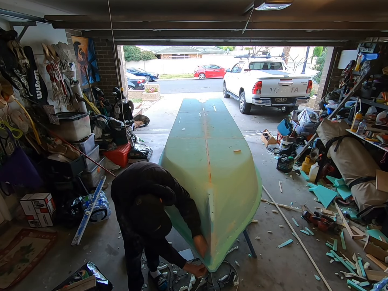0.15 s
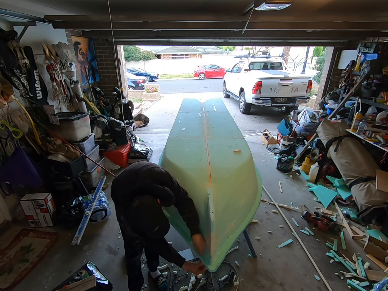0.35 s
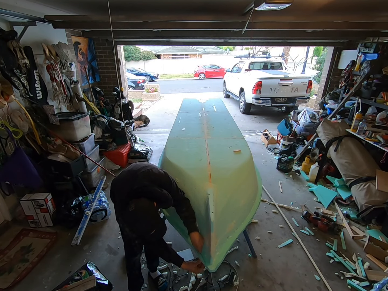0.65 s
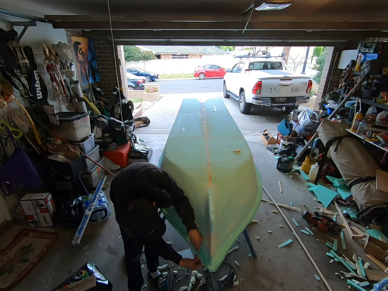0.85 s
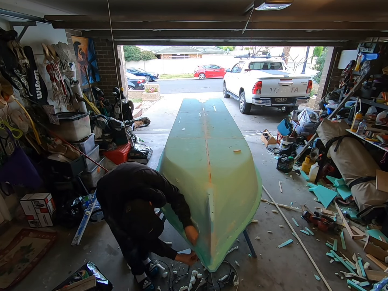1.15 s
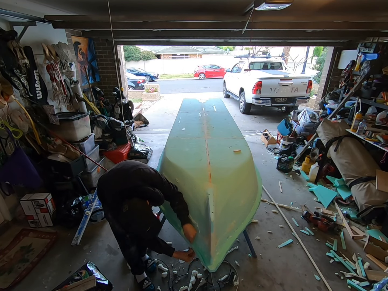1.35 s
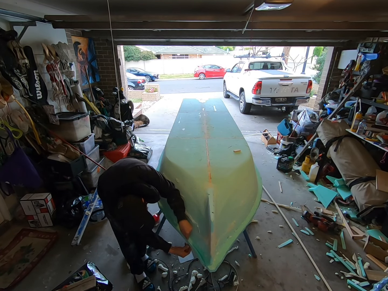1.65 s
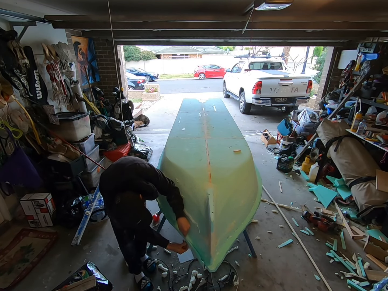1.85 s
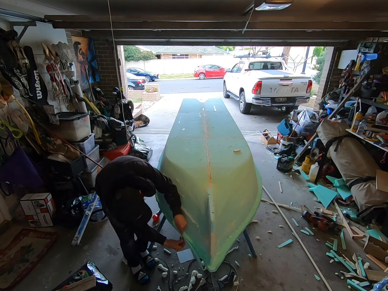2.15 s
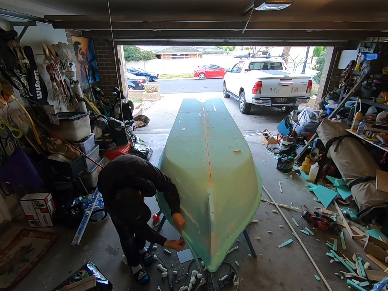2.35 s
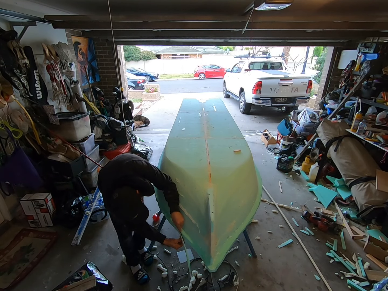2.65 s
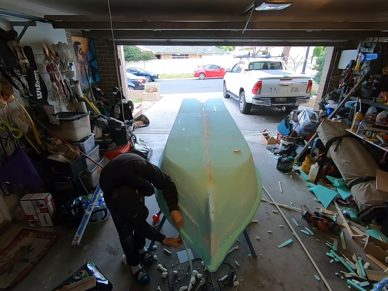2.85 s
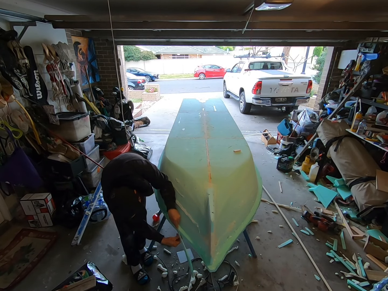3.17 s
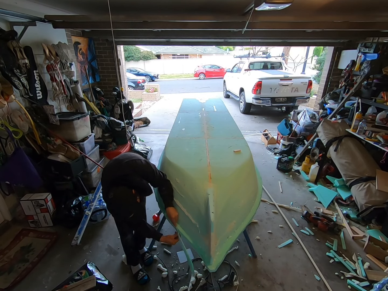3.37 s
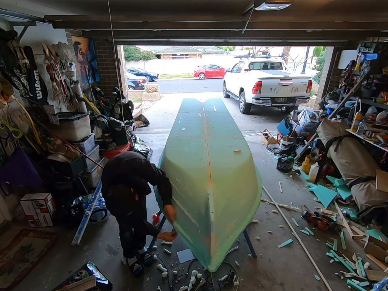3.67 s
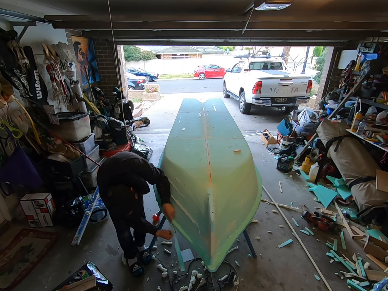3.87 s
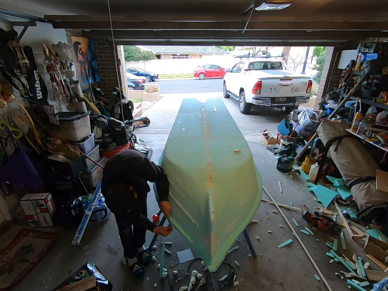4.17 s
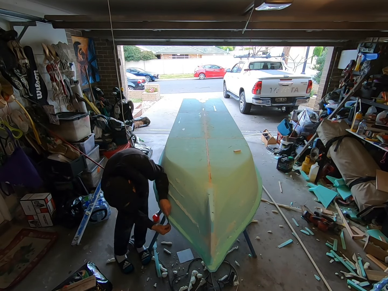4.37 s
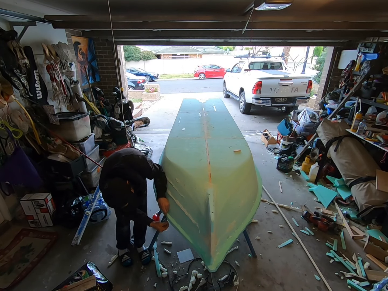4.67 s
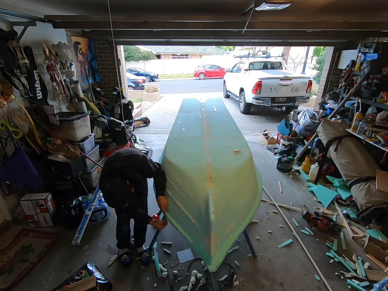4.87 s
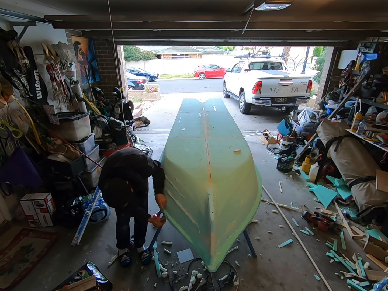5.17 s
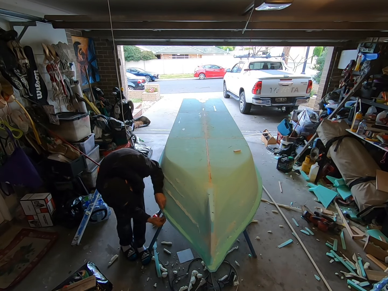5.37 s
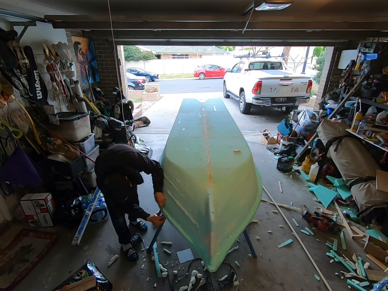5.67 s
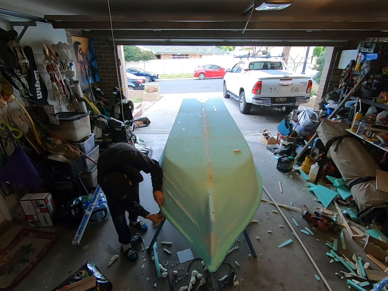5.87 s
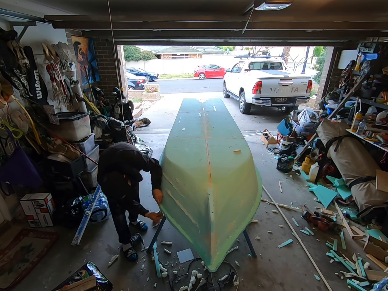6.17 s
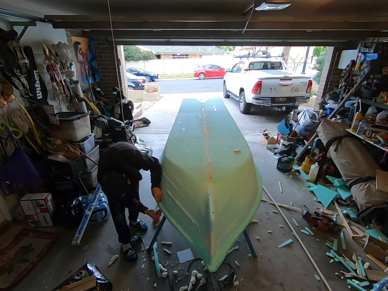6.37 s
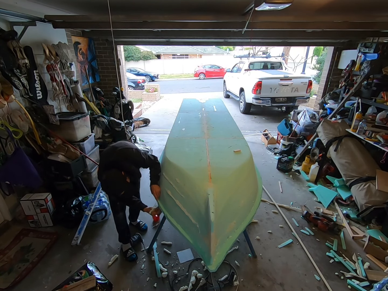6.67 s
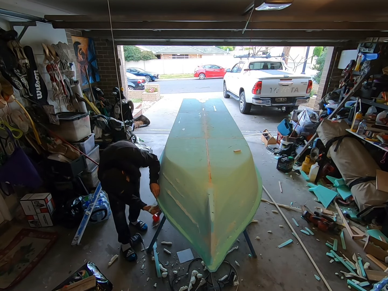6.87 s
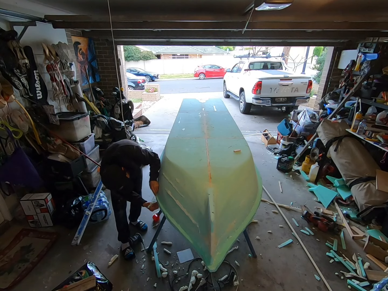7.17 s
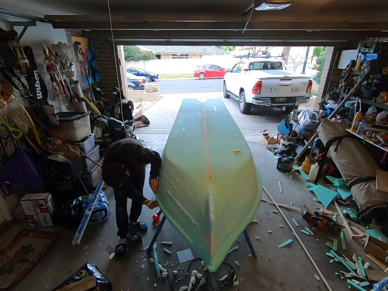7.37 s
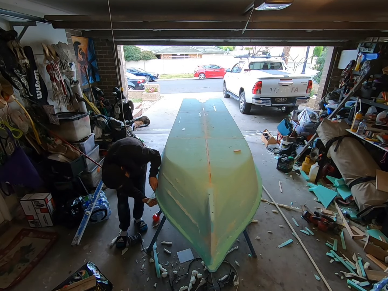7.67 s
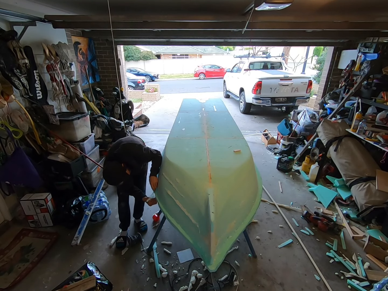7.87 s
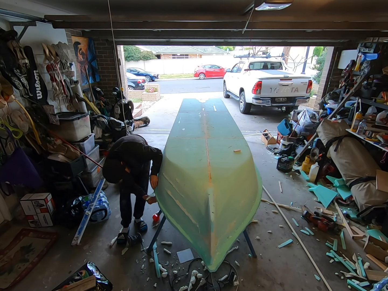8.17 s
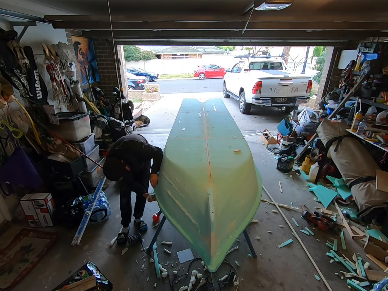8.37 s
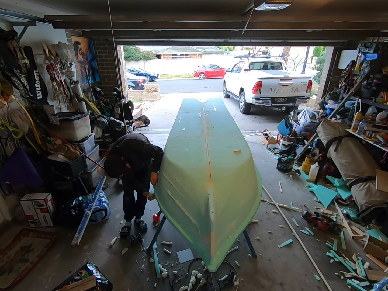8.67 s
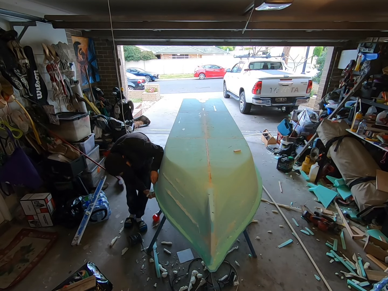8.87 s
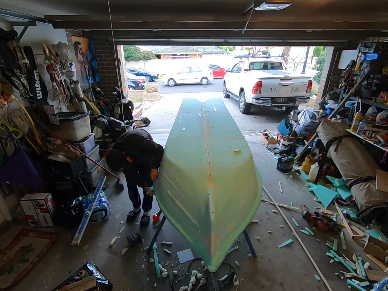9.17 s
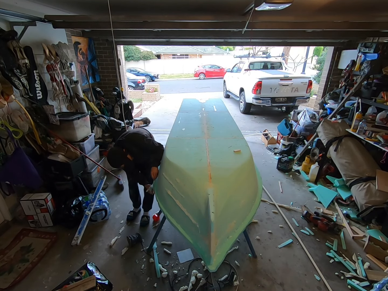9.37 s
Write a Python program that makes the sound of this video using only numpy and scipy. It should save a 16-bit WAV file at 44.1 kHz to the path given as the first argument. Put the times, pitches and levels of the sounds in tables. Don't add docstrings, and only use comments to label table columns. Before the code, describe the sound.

Close dry crunchy sawing strokes on foam, quick and uneven, with small bumps, a hard snap midway, and low moaning drags near the end.

```python
import sys
import numpy as np
from scipy import signal
from scipy.fft import rfft, irfft, next_fast_len
from scipy.io import wavfile
from scipy.ndimage import uniform_filter1d, map_coordinates

SR = 44100
rng = np.random.default_rng(int(sys.argv[2]) if len(sys.argv) > 2 else 0)


def volts_from_decibels(level):
    exponent = np.asarray(level, float) / 20
    return 10 ** exponent


def generate_wav(signal):
    frames = np.transpose(np.atleast_2d(signal))
    scaled = np.clip(frames, -1, 1) * 32767
    pcm = np.round(scaled).astype(np.int16)
    wavfile.write(sys.argv[1], SR, pcm)


N = 420273

# start_s, level_db
DRAG = [(0, -39.5), (.13, -45.5), (.32, -41.5), (.6, -37), (.77, -43.5), (2.02, -45), (2.44, -65),
        (2.52, -51), (2.68, -69.5), (2.75, -56), (3.48, -56), (3.8, -60.5), (5.07, -65), (7.88, -63),
        (8.7, -52), (9.0, -47), (9.29, -34.5), (9.53, -56.5)]
LIGHT_DB = -59
# turn_s, turn_db, rise_to_bite_s, bite_db
STROKES = [(0.0, -36, 0.0067, -38), (.03, -41, 0.0036, -46.5), (0.066, -54, 0.018, -46),
           (.107, -48, 0.038, -38.5), (.178, -45.5, 0.03, -39.5), (.238, -42.5, .02, -44),
           (.278, -44.5, .015, -44), (.325, -48, 0.0084, -37.5), (.372, -47.5, 0.029, -39),
           (.423, -46, 0.0089, -37.5), (.465, -46.5, 0.032, -40), (.528, -44, 0.016, -37),
           (0.564, -42, 0.0085, -36), (.599, -49, 0.009, -41.5), (.63, -43, .01, -40),
           (.66, -43, 0.013, -43), (.698, -47.5, 0.016, -41), (.742, -46, 0.097, -41.5),
           (.948, -44.5, 0.043, -39.5), (1.038, -45, 0.014, -38.5), (1.115, -45.5, 0.045, -38),
           (1.172, -39, 0.019, -38.5), (1.215, -45, .01, -43), (1.293, -45.5, 0.033, -41.5),
           (1.55, -43.5, 0.067, -41), (1.7, -42, .04, -39), (1.76, -38.5, 0.0089, -40),
           (1.838, -46.5, 0.07, -39), (1.957, -45, 0.034, -38), (2.059, -44, 0.031, -40),
           (2.133, -49.5, 0.03, -38.5), (2.243, -49.5, 0.041, -44), (2.321, -56, 0.014, -46.5),
           (2.379, -57, 0.013, -51), (2.436, -62, 0.048, -42), (2.634, -52, 0.048, -52.5),
           (2.71, -70, 0.015, -48), (2.768, -55.5, 0.059, -43.5), (2.869, -53, 0.025, -42.5),
           (2.939, -52, 0.045, -43),
           (3.022, -55, 0.042, -39.5), (3.117, -45, 0.058, -41), (3.293, -46, 0.084, -40.5),
                (3.429, -55.5, 0.031, -36.5), (3.515, -65, 0.015, -53), (3.542, -61, 0.028, -40),
                (3.688, -41.5, 0.048, -35), (3.817, -65, 0.015, -42), (3.941, -50, 0.088, -37.5),
                (4.037, -50, 0.0094, -39), (4.17, -48, 0.057, -42), (4.334, -51.5, 0.014, -46.5),
                (4.39, -51.5, 0.021, -45.5), (4.432, -46.5, 0.054, -41), (4.5, -39.5, 0.018, -38.5),
                (4.564, -43.5, 0.024, -38.5), (4.635, -39.5, 0.0062, -41), (4.709, -67, 0.014, -50.5),
                (4.787, -64, 0.023, -46.5), (4.845, -56.5, 0.025, -42), (4.937, -45.5, 0.042, -42.5),
                (4.997, -49, .006, -40), (5.025, -47, 0.0078, -42), (5.11, -49, 0.022, -39.5),
                (5.212, -52.5, 0.021, -36), (5.299, -53.5, .0067, -47), (5.335, -53, 0.019, -40),
                (5.492, -62, 0.029, -51.5), (5.56, -68, 0.018, -52), (5.612, -54, 0.011, -41),
                (5.711, -70, 0.0045, -46), (5.751, -65, 0.022, -41.5), (5.816, -57, 0.031, -40),
           (5.908, -53, 0.016, -40), (5.983, -50.5, 0.085, -47.5), (6.08, -64, 0.0078, -42.5),
                (6.179, -47, 0.033, -38.5), (6.272, -64.5, 0.059, -37.5), (6.39, -44, 0.045, -42.5),
                (6.474, -51.5, 0.026, -40), (6.565, -49, 0.0092, -46), (6.627, -56.5, 0.016, -47),
                (6.676, -55, 0.024, -42), (6.745, -54.5, 0.019, -42), (6.825, -50, 0.036, -41),
                (6.912, -53.5, 0.036, -40.5), (7.044, -53.5, 0.03, -42.5), (7.128, -48, 0.037, -43),
                (7.198, -52.5, 0.033, -43.5), (7.296, -46.5, 0.0058, -44.5), (7.369, -46.5, 0.11, -38.5),
                (7.535, -53, 0.038, -46), (7.643, -52, 0.018, -39.5), (7.719, -51.5, 0.0076, -44.5),
                (7.765, -45, 0.022, -45), (7.83, -55, 0.017, -51.5), (7.885, -57, 0.011, -55.5),
                (7.99, -62, .01, -55), (8.045, -53.5, 0.037, -46), (8.127, -52.5, 0.031, -43),
                (8.243, -48, .02, -45), (8.3, -47, 0.035, -41.5), (8.375, -47, 0.0036, -43),
                (8.557, -48.5, 0.036, -45), (8.7, -45, 0.044, -41), (8.882, -43.5, 0.065, -42),
                (9.189, -39, 0.034, -39.5), (9.4, -41, .02, -41.5), (9.47, -43, .02, -41.5)]
LET_GO_SHARE, SLOWEST_FALL_DB_PER_S, SAG_DB_PER_S = 0.68, 42, 1
SIDE_FROM_S, SIDE_FADE_S = 7.9, 0.2

# start_s, edge_db
EDGE_ON = [(0, -8), (.75, -7), (1.15, -1.5), (1.5, -1.5), (1.9, -0.5), (2.5, -2.5), (3.5, -1), (3.95, -1),
           (4.6, -2.5), (5.4, -2), (6.1, -4.5), (7.2, -2.5), (7.45, 0), (7.6, -2.5), (8.4, -3), (8.86, -6),
           (8.92, -6), (9.53, -5.5)]
# freq_hz, density_db_per_hz
TEAR = [(1350, -19), (2300, 1), (3500, -2), (3850, 1), (4450, 1), (4910, -1.5), (5510, -1.5), (7200, -18),
        (9360, -21), (15800, -120)]
FIZZ = [(3820, -32), (6500, -5), (8170, -3), (9840, -2.5), (11800, -5.5), (13500, -6), (15500, -9.5)]
# pitch_hz, width_hz, level_db
EDGE = [(5150, 35, -13), (6600, 200, 1.5), (6040, 390, 15.5), (7600, 63, -19), (8670, 31, 10),
        (9410, 220, 10), (12300, 400, -4)]
# pitch_hz, width_hz, level_db
RASP = [(1300, 216, -4.5), (1450, 160, -0.5), (1630, 37, 0), (1708, 120, -2.5), (2102, 243, -1),
        (2293, 95, 1), (3280, 400, -10.5)]
SIDE_RASP = [(1300, 320, 6), (2100, 120, 11), (2920, 570, 0), (4150, 130, 10), (4590, 360, -7),
             (6100, 240, -33)]
RASP_DB, RASP_PER_EDGE, RASP_PER_LEAN, SIDE_RASP_DB = -13.5, -1.35, 0.21, 3
# start_s, length_s, level_over_stroke_db, pitch_hz
BLADE_NOTES = [
    (.28, 0.48, -9.5, 4310),
    (8.1, 1.1, -14.5, 3026),
    (8.2, .95, -13, 3936),
]
BLADE_SHARPNESS = 99

# pitch_hz, width_hz, level_db
SKIN = [(748, 93, -2.5), (838, 95, 2), (925, 109, -1), (1163, 8.6, -1.5)]
SIDE_SKIN = [(506, 49, -12), (684, 61, 0.5), (771, 77, -1), (930, 80, -9.5), (1070, 340, -22)]
# pitch_hz, width_hz, level_db
BOW_PANEL = [(865.6, 18, 2), (902.7, 24, -2)]
# start_s, level_db
BOW_NEARNESS = [(0, -0.5), (.7, 1), (1.2, 5), (2.1, 4), (2.7, 0.5), (3.1, 0.5), (3.6, 3), (4.2, -5),
                (9.53, -0.5)]
# pitch_hz, width_hz, level_db
RIB = [(550, 130, -10), (603, 38, -2), (666, 15.4, 3)]
# pitch_hz, width_hz, level_db
CAVITY = [(45.6, 47, -32), (85, 19, -18), (153.7, 16, -4.5), (202, 28, -4), (312, 44, -6), (384, 16, -22)]
RIB_PER_LEAN, CAVITY_DB, CAVITY_PER_LEAN = -0.48, -75.5, 0.47

# start_s, freq_hz, depth_db
SHADOW = [(.7, 5140, 1.5), (.93, 4800, 10), (1.08, 3930, 20), (1.2, 3200, 8), (1.3, 2740, 12),
          (1.42, 2420, 13), (1.65, 1930, 15), (1.85, 1560, 14), (2.1, 1240, 21), (2.4, 990, -12)]
# freq_hz, density_db_per_hz
AIR = [(15, -64), (25, -19), (90, -10), (200, -6.5), (373, -16.5), (463, -1.5), (659, -4.5), (1520, -12.5),
       (2160, -4), (2350, -9), (4030, -3.5), (8830, -8.5), (14800, -13), (16000, -17)]
AIR_DB = -49.5
# freq_hz, likeness_ratio
ALIKE = [(60, 0.18), (130, 0.73), (290, 0.29), (640, 0.54), (1410, 0.16), (3100, 0.074), (6820, 0.15),
         (15000, 1)]
# freq_hz, t60_s
GARAGE = [(200, 0.32), (2000, 0.069), (10000, 0.025)]
# freq_hz, level_db
WET = [(200, -22), (700, -43), (1500, -8), (3500, -0.5), (8000, -0.5), (12000, -4), (15000, 3)]

# start_s, peak_db, t60_s, pitch_hz, puff_db
BUMPS = [(0.114, -50, 0.2, 172, -1), (0.336, -34.5, 0.12, 189, 0), (.345, -43, 0.31, 298, 0),
         (.54, -49.5, 0.26, 318, -6), (1.035, -32.5, 0.16, 189, -5), (1.045, -39, 0.2, 282, -6),
         (1.075, -40, 0.14, 315, -10), (1.122, -39, 0.14, 183, -1), (1.912, -27, 0.16, 876, -23),
         (2.018, -23.5, 0.13, 906, -30), (1.135, -38, 0.19, 274, -5), (1.19, -52.5, 0.38, 321, 2),
         (2.71, -61, 0.1, 70, 0), (8.957, -45, 0.19, 142, -7.5), (3.18, -45, 0.058, 90, 3),
         (4.0, -53, 0.24, 238.6, 5), (4.071, -46, 0.13, 262, -3), (5.479, -34.5, 0.067, 527, -34),
         (6.91, -57.5, 1.6, 284, -22), (7.421, -57, 0.57, 194, -8), (8.532, -39, 0.069, 92, -11),
         (9.168, -43.5, 0.25, 85, -10)]
# start_s, peak_db, pitch_hz
NUDGES = [(2.292, -59, 182), (2.466, -56, 213), (2.613, -58, 272), (2.782, -58, 192), (2.895, -49, 197),
          (3.173, -55, 242), (3.385, -47, 193), (3.468, -50, 195), (3.591, -48, 314.8), (3.686, -56, 149),
          (3.891, -68, 191), (4.006, -49, 297), (4.07, -48, 233), (4.321, -61, 213), (4.473, -62, 203),
          (4.936, -56, 204), (5.214, -58, 228), (5.379, -59, 155), (5.628, -58, 205), (5.718, -55, 217),
          (5.949, -62, 310), (6.1, -60, 223), (6.198, -62, 315), (6.992, -53, 285), (7.272, -62, 277),
          (7.428, -53, 198), (7.579, -53, 188.7), (7.694, -56, 178), (7.84, -68, 162), (8.054, -56, 174)]
NUDGE_DB, NUDGE_T60_S, NUDGE_PUFF_DB = 2, 0.13, -3
# pitch_hz, width_hz, level_db
PUFF = [(70, 110, -12.5), (213, 51, 10.0), (335, 120, 3.5)]

# start_s, length_s, level_db, from_hz, to_hz
RINGS = [(0.201, 0.036, -40.5, 5350, 5260), (0.783, 0.049, -44, 5400, 5200), (.85, 0.65, -53, 3680, 1800),
         (8.298, .1, -52, 4000, 3900), (8.58, 0.13, -55, 3000, 2950), (4.35, 0.047, -59, 9100, 9200),
         (5.22, 0.062, -45, 2090, 2170), (5.613, 0.054, -45.5, 2080, 2100), (7.422, 0.098, -40, 5700, 5500),
         (8.723, 0.57, -50, 3900, 4030), (9.358, 0.28, -47.5, 2800, 2760)]
RING_WIDTH, RING_RISE, RING_FADE = 0.045, 0.12, 0.28
# start_s, length_s, level_db, from_hz, to_hz
SKIDS = [
    (0.811, 0.033, -36.5, 3600, 2500),
    (4.001, 0.032, -28.5, 8400, 4400),
    (4.633, 0.052, -46, 2900, 1000),
    (3.115, 0.094, -37.5, 8700, 6600),
    (3.148, 0.12, -39.5, 3400, 4200),
    (3.21, 0.078, -41, 5000, 6000),
    (4.426, 0.097, -40, 10500, 13000),
    (9.16, 0.04, -37.5, 8900, 8500),
    (9.133, 0.4, -37.5, 2500, 3700),
]
SKID_WIDTH, SKID_OVERTONE, SKID_OVERTONE_DB = 0.21, 1.87, -9.5
# start_s, length_s, level_db, lowest_hz, width_share
SWISHES = [
    (4.028, 0.064, -35.5, 4180, 0.69),
    (7.421, 0.1, -30, 6900, 0.43),
]
SWISH_RISE, SWISH_FADE = 0.22, 0.23
DIVE_OCT, CLIMB_OCT, LOWEST_AT = 0.84, 0.88, 0.16
# start_s, peak_db, body_db, t60_s, lowest_hz
CATCHES = [(2.148, -25, -29, 0.07, 2200), (2.4759, -28.5, -8, 0.041, 2200), (3.4465, -24, -19, 0.073, 2200),
           (4.1027, -25, -17, 0.14, 2200), (.5835, -38, -20, .04, 1200), (.642, -38, -20, .04, 1200),
           (4.369, -26.5, -27, 0.034, 2500), (4.968, -23, -45, 0.084, 7000), (5.03, -27, -16, 0.036, 6000),
           (5.126, -28, -29, 0.04, 5000), (5.6212, -17, -42, 0.011, 2980), (5.6218, -19, -42, 0.088, 2500),
           (5.637, -24, -33, 0.047, 2000), (5.7152, -42, -24, 0.038, 1800), (5.7666, -32, -28, 0.06, 2200),
           (5.917, -31, -24, 0.05, 2200), (6.0538, -26.5, -38, 0.12, 2200),
           (6.194, -24.5, -39, 0.077, 2200)]
SOFT_RISE_S, HARD_DB = 0.00026, -20

# start_s, level_db, third_overtone_db
HUM = [
    [(8.18, -80, -20.5), (8.262, -58, -6), (8.282, -57, -8), (8.302, -79, -8), (8.452, -53.5, -10),
     (8.488, -64, -8), (8.56, -66, -8), (8.58, -67, -8)],
    [(8.6, -61, -17), (8.7, -47, -10), (8.77, -53, -4), (8.84, -68, -8), (8.886, -54, -1), (8.964, -57, -5),
     (9.012, -67, -8), (9.06, -64, -8)],
    [(9.07, -60, -5), (9.128, -43, 0.5), (9.264, -46, -12), (9.284, -44, -8), (9.388, -43, -8),
     (9.432, -54, -10), (9.514, -49.5, -6.5), (9.53, -52.5, -8)],
]
HUM_HZ, HUM_HZ_PER_LEAN = 196.4, 0.35
HUM_SECOND_DB, RUMBLE_DB = -11.5, -7.5
# pitch_hz, width_hz, level_db
RUMBLE = [(90, 77, -12.5), (163, 35, 2), (268, 80, -1)]

TOP_HZ = 15600


def unit(x):
    return x / np.sqrt(np.mean(x ** 2) + 1e-20)


def along(points, hz):
    f, v = np.transpose(points)
    return np.interp(np.log(hz + 1), np.log(f + 1), v)


def curves(rows):
    s, *cols = np.transpose(rows)
    return [np.interp(np.arange(N) / SR, s, c) for c in cols]


def wobble(rate):
    knots = rng.standard_normal(int(N * rate / SR) + 4)
    return map_coordinates(knots, [np.arange(N) * rate / SR])


def filtered(x, response):
    m = next_fast_len(N + SR // 2)
    return irfft(rfft(x, m) * response(np.fft.rfftfreq(m, 1 / SR)), m)[..., :N]


def modes(table):
    def response(f):
        total = 0
        for k, (c, w, db) in enumerate(table):
            total = total + (-1) ** k * volts_from_decibels(db) * 1j * f * w / (c * c - f * f + 1j * f * w)
        return total
    return response


def swept(x, gain):
    hz, t, z = signal.stft(x, SR, nperseg=384)
    return signal.istft(z * gain(np.log(hz[:, None] + 1), t), SR, nperseg=384)[1][:N]


def bell(log_f, hz, width):
    return np.exp(-0.5 * ((log_f - np.log(hz)) / width) ** 2)


def swell(t, start, length, rise, fade):
    u = (t - start) / length
    return u, np.clip(np.minimum(u / rise, (1 - u) / fade), 0, 1) ** 2


def snaps(per_s, spread_db, hush):
    when, size, sign = rng.random((3, N))
    sizes = volts_from_decibels(-spread_db * np.log(size + 0.0035))
    bursts = (when < per_s / SR) * sizes * np.sign(sign - 0.5)
    return unit(unit(bursts) + hush * rng.standard_normal(N))


def lean():
    return curves(DRAG)[0] - LIGHT_DB


def on_side():
    return np.clip((np.arange(N) / SR - SIDE_FROM_S) / SIDE_FADE_S, 0, 1)


def grip():
    s, turn_db, rise, bite_db = np.transpose(STROKES)
    end = np.append(s[1:], N / SR + 0.1)
    end_db = np.append(turn_db[1:], turn_db[-1])
    slowest = abs(bite_db - end_db) / SLOWEST_FALL_DB_PER_S
    fall = np.minimum(LET_GO_SHARE * abs(end - s - rise), slowest)
    let_go_db = bite_db - SAG_DB_PER_S * abs(end - fall - s - rise)
    times = np.maximum.accumulate(np.transpose([s, s + rise, end - fall]).ravel())
    levels = np.transpose([turn_db, bite_db, let_go_db]).ravel()
    return curves(np.transpose([times, levels]))[0]


def blade():
    edge_db, = curves(EDGE_ON)
    fizz_share = 1 / (1 + volts_from_decibels(-2 * (edge_db + 1.65 * wobble(8.2))))
    tremble = volts_from_decibels(0.5 * wobble(45) + 0.74 * wobble(150))
    force = snaps(per_s=5000, spread_db=2.5, hush=0.72) * tremble
    singing = np.clip(0.5 + 0.55 * wobble(5.5), 0, 1)
    sung = filtered(force, lambda hz: abs(1 + 0.19 * modes(EDGE)(hz)))
    force_edge = singing * sung + (1 - singing) * force

    def coloured(table):
        return unit(filtered(force_edge, lambda hz: volts_from_decibels(along(table, hz))))

    tear = volts_from_decibels(-1.83) * np.sqrt(1 - fizz_share) * coloured(TEAR)
    fizz = volts_from_decibels(3.5) * np.sqrt(fizz_share) * coloured(FIZZ)
    moved = on_side()
    panel = (1 - moved) * unit(filtered(force, modes(RASP)))
    panel = panel + moved * volts_from_decibels(SIDE_RASP_DB) * unit(filtered(force, modes(SIDE_RASP)))
    rasp = volts_from_decibels(RASP_DB + RASP_PER_EDGE * edge_db + RASP_PER_LEAN * lean()) * panel
    for start, length, db, hz in BLADE_NOTES:
        note = unit(signal.lfilter(*signal.iirpeak(hz, BLADE_SHARPNESS, SR), force))
        rasp = rasp + volts_from_decibels(db) * swell(np.arange(N) / SR, start, length, RING_RISE, 0.18)[1] * note
    return volts_from_decibels(grip() - 1.5) * (tear + fizz + rasp)


def hull():
    skin_db = LIGHT_DB + lean()
    rib_db = RIB_PER_LEAN * lean()
    cavity_db = CAVITY_DB + CAVITY_PER_LEAN * lean()
    grip_db = grip()
    flutter_db = grip_db - uniform_filter1d(grip_db, size=SR // 5)
    force = snaps(per_s=1200, spread_db=5.0, hush=1.06) * volts_from_decibels(0.53 * wobble(25) + 0.68 * flutter_db)

    def shaken(table):
        return unit(filtered(force, lambda hz: modes(table)(hz) / (1 + (440 / (hz + 1)) ** 6)))

    near_db, = curves(BOW_NEARNESS)
    bow = (shaken(SKIN) + volts_from_decibels(near_db) * shaken(BOW_PANEL)) / np.sqrt(1 + volts_from_decibels(2 * near_db))
    skin = (1 - on_side()) * bow + on_side() * shaken(SIDE_SKIN)
    rib = volts_from_decibels(rib_db - 1.5 + 1.4 * wobble(8.1)) * shaken(RIB)
    lumps = volts_from_decibels(0.07 * flutter_db + 3.5 * np.tanh(wobble(16)))
    cavity = unit(filtered(force * lumps, modes(CAVITY)))
    return volts_from_decibels(skin_db + 3.5) * (skin + rib) + volts_from_decibels(cavity_db + 5.5) * cavity


def shadow(x):
    s, dip_hz, depth_db = np.transpose(SHADOW)

    def gain(f, t):
        hz = np.interp(t, s, dip_hz)
        shape = 0.48 * bell(f, 0.86 * hz, 0.13) - bell(f, 0.93 * hz, 0.08) - 0.24 * bell(f, 1.236 * hz, 0.056)
        return volts_from_decibels(np.interp(t, s, depth_db) * shape)
    return swept(x, gain)


def garage(x):
    step = SR // 10
    out = np.zeros((2, N + 2 * SR))
    pieces = signal.stft(x, nperseg=2 * step, return_onesided=False)[2]
    pieces = np.fft.ifft(pieces, axis=0).real.T * step
    noise = rng.standard_normal((len(pieces), 2, SR // 12))
    hz, t, z = signal.stft(noise, SR, nperseg=256)
    tails = signal.istft(z * volts_from_decibels(-60 * t / along(GARAGE, hz)[:, None]), SR, nperseg=256)[1]
    tails = tails / np.linalg.norm(tails, axis=2, keepdims=True)
    echoes = signal.fftconvolve(pieces[:, None], tails, axes=2)
    for k, echo in enumerate(echoes):
        out[:, k * step:][:, :echo.shape[1]] += echo
    late = out[:, step - 60:][:, :N]
    return filtered(late, lambda hz: volts_from_decibels(along(WET, hz) + 0.3))


def air():
    def mid_side(hz):
        turn = np.arccos(np.clip(along(ALIKE, hz), -1, 1)) / 2
        dull = hz / (hz + 250) / np.sqrt(1 + (hz / 1200) ** 2.0)
        return dull * volts_from_decibels(along(AIR, hz)) * np.array([np.cos(turn), np.sin(turn)])

    mid, side = filtered(rng.standard_normal((2, N)), mid_side)
    return volts_from_decibels(AIR_DB - 9.0 + 2.6 * wobble(3.42)) * unit(np.array([mid + side, mid - side]))


def bumps():
    ring, puff = np.zeros((2, N + SR))
    t = np.arange(SR // 2) / SR
    nudges = [(s, db + NUDGE_DB, NUDGE_T60_S, hz, NUDGE_PUFF_DB) for s, db, hz in NUDGES]
    for s, db, t60, hz, puff_db in BUMPS + nudges:
        i = round(s * SR)
        fade = volts_from_decibels(db - 60 * t / t60) * (1 - np.exp(-t / 0.0085))
        ring[i:][:len(t)] += 0.91 * fade * np.sin(2 * np.pi * hz * t)
        puff[i:][:len(t)] += volts_from_decibels(puff_db + 14.5 - 60 * t / 0.89) * fade * rng.standard_normal(len(t))
    return ring[:N] + filtered(puff[:N], modes(PUFF))


def swishes():
    def even(hz, width):
        return np.sqrt(SR / (4 * hz * width))

    def bands(f, t):
        gain = 0
        for start, length, db, low_hz, width in SWISHES:
            u, shape = swell(t, start, length, SWISH_RISE, SWISH_FADE)
            off = np.clip(u, 0, 1) - LOWEST_AT
            dive = DIVE_OCT * (off / LOWEST_AT) ** 2
            climb = CLIMB_OCT * (off / (1 - LOWEST_AT)) ** 2
            hz = low_hz * 2 ** np.where(off < 0, dive, climb)
            band = bell(f, hz, width) + 0.27 * bell(f, 2.0 * hz, width)
            gain = gain + volts_from_decibels(db) * shape * band * even(hz, width)
        for start, length, db, from_hz, to_hz in SKIDS:
            u, shape = swell(t, start, length, 0.33, 0.47)
            hz = from_hz * (to_hz / from_hz) ** np.clip(u, 0, 1)
            overtone = volts_from_decibels(SKID_OVERTONE_DB) * bell(f, SKID_OVERTONE * hz, SKID_WIDTH)
            gain = gain + volts_from_decibels(db) * shape * (bell(f, hz, SKID_WIDTH) + overtone) * even(hz, SKID_WIDTH)
        for start, length, db, from_hz, to_hz in RINGS:
            u, shape = swell(t, start, length, RING_RISE, RING_FADE)
            hz = from_hz * (to_hz / from_hz) ** np.clip(u, 0, 1)
            gain = gain + volts_from_decibels(db) * shape * bell(f, hz, RING_WIDTH) * even(hz, RING_WIDTH)
        return gain
    return swept(snaps(per_s=6000, spread_db=3.0, hush=0.6), bands)


def catches():
    bright, jolt = np.zeros((2, N + SR))
    t = np.arange(SR // 4) / SR
    click = 1 + 0.87 * volts_from_decibels(-60 * t / 0.0065)
    for s, db, body_db, t60, low_hz in CATCHES:
        i = round(s * SR)
        rise = 1 - np.exp(-t / (SOFT_RISE_S * volts_from_decibels(HARD_DB - db)))
        crackle = volts_from_decibels(db - 4.5 - 60 * t / t60) * rise * click * rng.standard_normal(len(t))
        bright[i:][:len(t)] += signal.lfilter(*signal.butter(2, low_hz, "high", fs=SR), crackle)
        jolt[i:][:len(t)] += volts_from_decibels(body_db + 23.5) * crackle
    softened = filtered(bright[:N], lambda hz: 1 / (1 + 1j * hz / 9000))
    return softened + filtered(jolt[:N], modes(SKIN + RIB))


def hum():
    pitch_hz = HUM_HZ + HUM_HZ_PER_LEAN * lean() + 2.57 * wobble(16)
    turn = 2 * np.pi * np.cumsum(pitch_hz) / SR
    first = volts_from_decibels(2.3 * wobble(45) + 0.55 * wobble(8.4)) * np.sin(turn)
    rumble = volts_from_decibels(RUMBLE_DB) * unit(filtered(rng.standard_normal(N), modes(RUMBLE)))
    db, third_db = curves(np.concatenate(HUM))
    second = volts_from_decibels(HUM_SECOND_DB) * np.sin(2 * turn)
    third = volts_from_decibels(third_db) * np.sin(3 * turn)
    begun = np.clip((np.arange(N) / SR - HUM[0][0][0]) / 0.03, 0, 1)
    return begun * volts_from_decibels(db + 4.0) * (first + rumble + second + third)


def scene():
    work = shadow(blade() + hull()) + bumps() + swishes() + catches() + hum()
    direct = work * volts_from_decibels([[-2.3], [-2.1]])
    return direct + garage(work) + air()


def band_limit(x):
    return signal.sosfilt(signal.butter(12, 16540, fs=SR, output="sos"), x)


def record(dry):
    mix = filtered(dry, lambda hz: hz < TOP_HZ)
    return band_limit(mix)


dry = scene()
out = record(dry)
generate_wav(out)
```